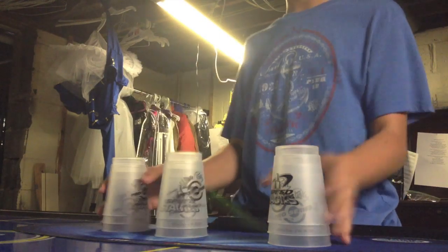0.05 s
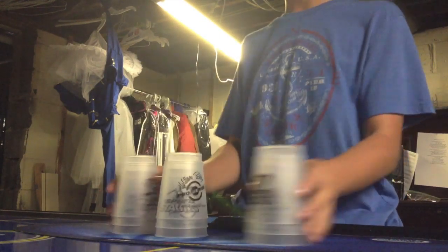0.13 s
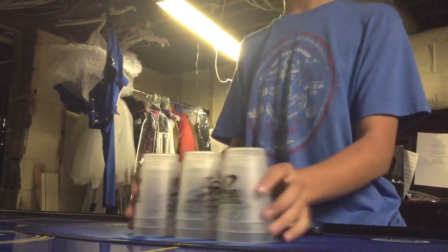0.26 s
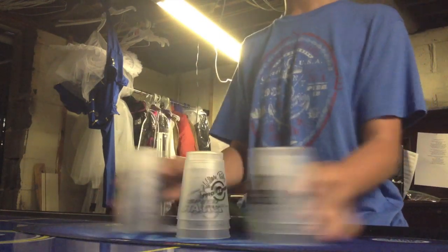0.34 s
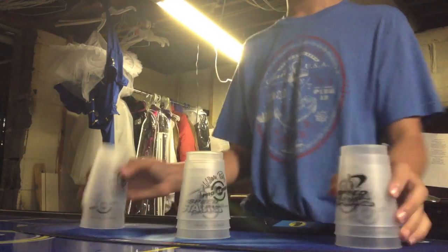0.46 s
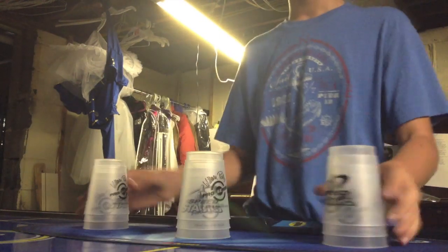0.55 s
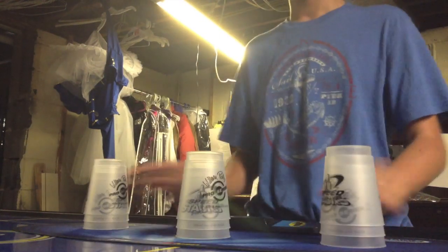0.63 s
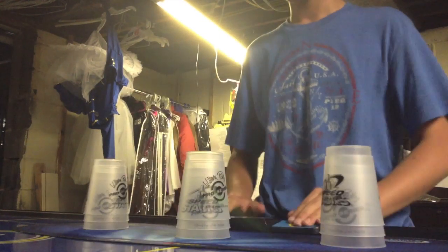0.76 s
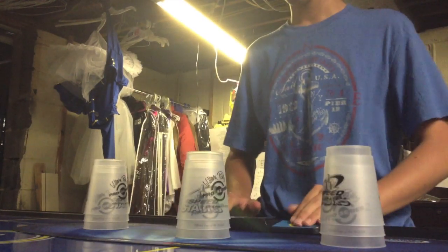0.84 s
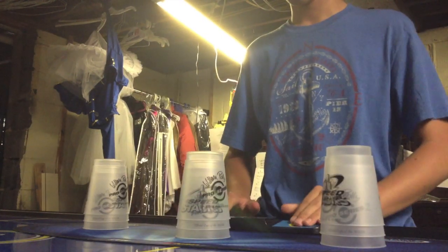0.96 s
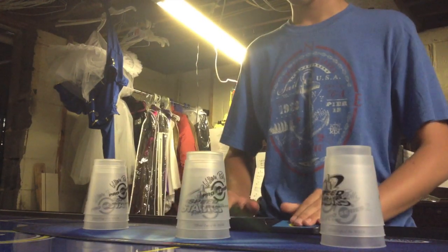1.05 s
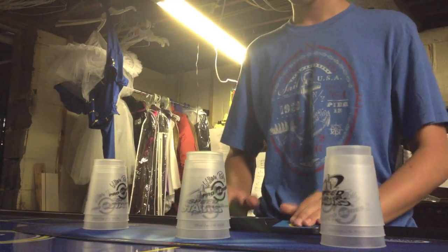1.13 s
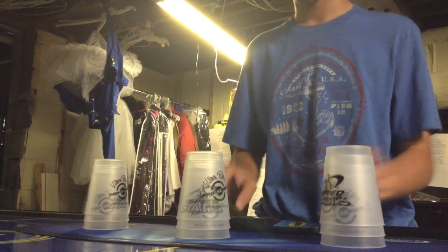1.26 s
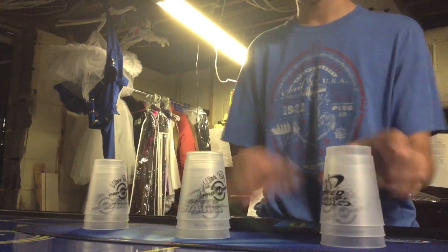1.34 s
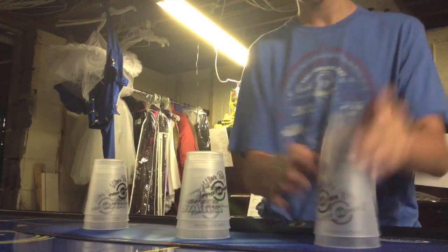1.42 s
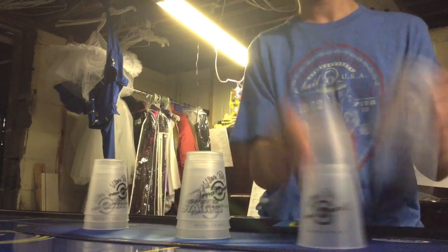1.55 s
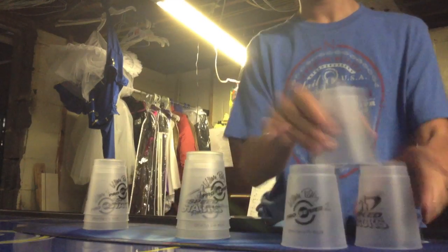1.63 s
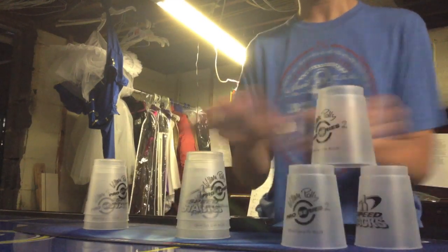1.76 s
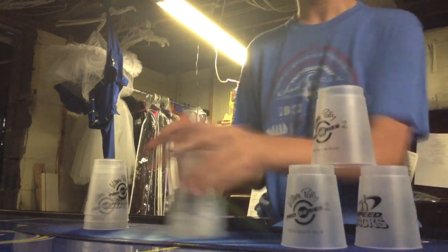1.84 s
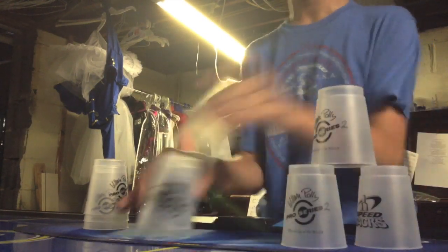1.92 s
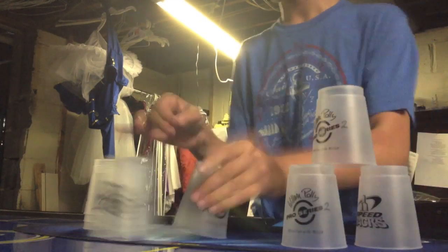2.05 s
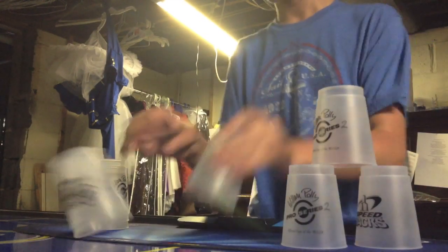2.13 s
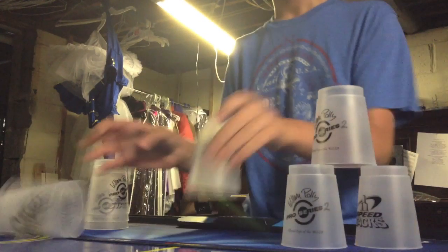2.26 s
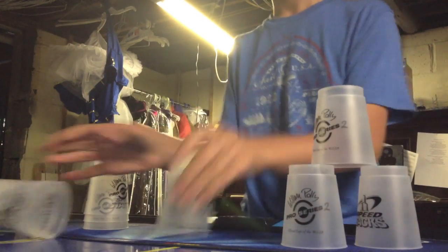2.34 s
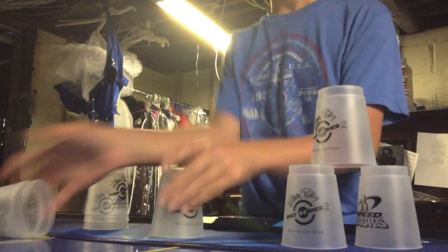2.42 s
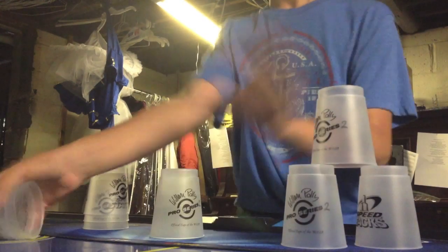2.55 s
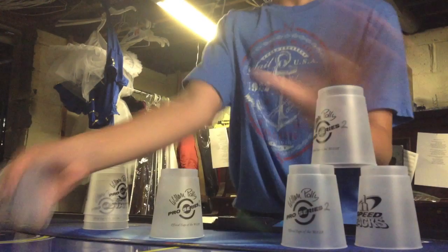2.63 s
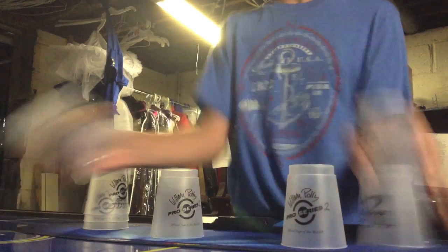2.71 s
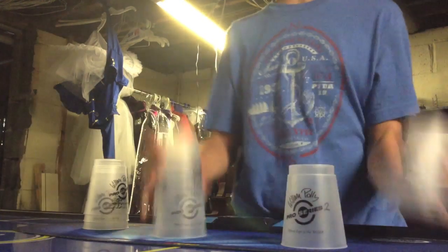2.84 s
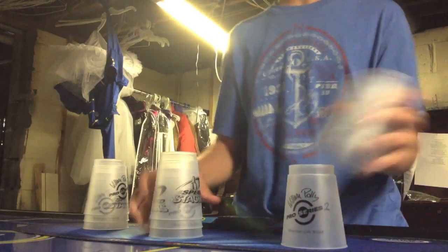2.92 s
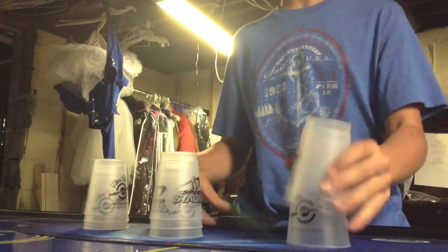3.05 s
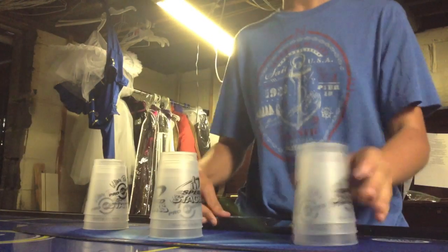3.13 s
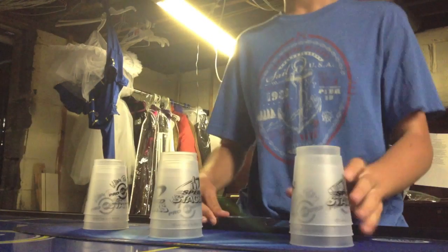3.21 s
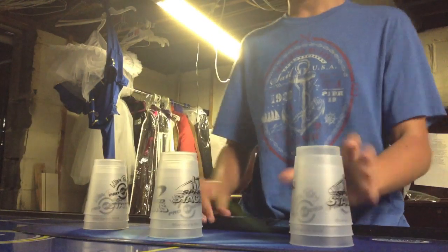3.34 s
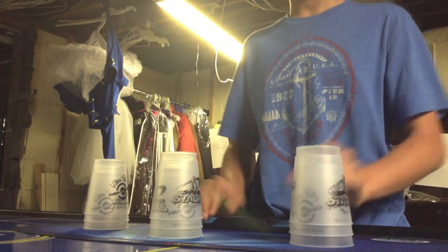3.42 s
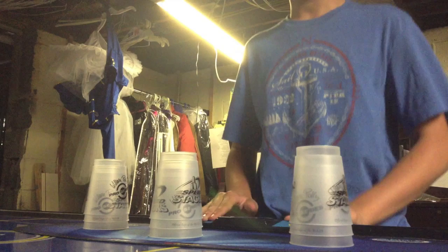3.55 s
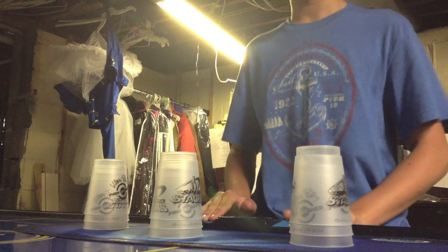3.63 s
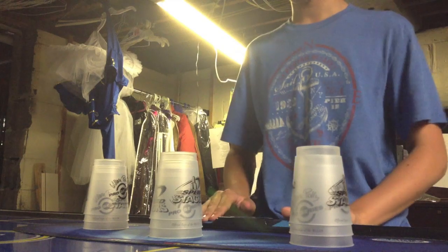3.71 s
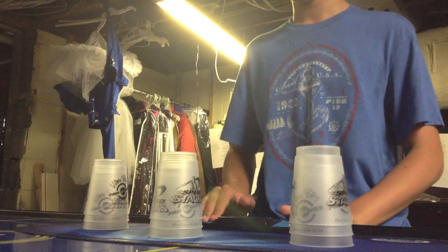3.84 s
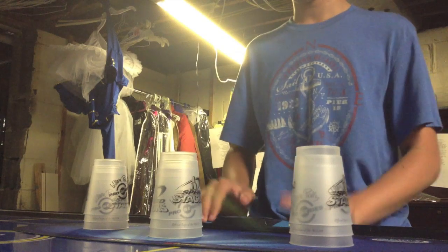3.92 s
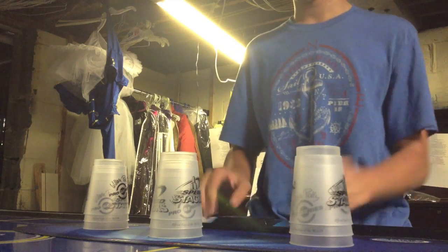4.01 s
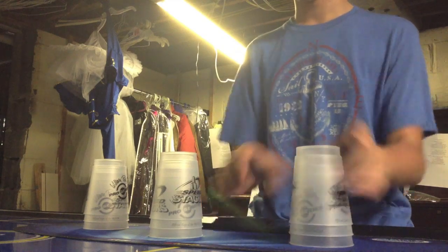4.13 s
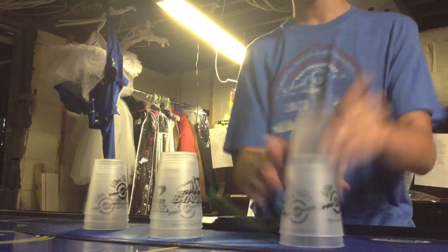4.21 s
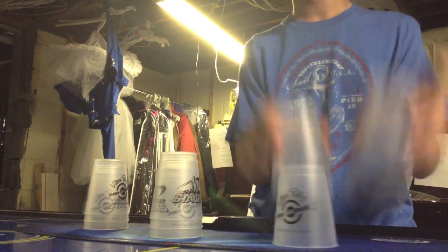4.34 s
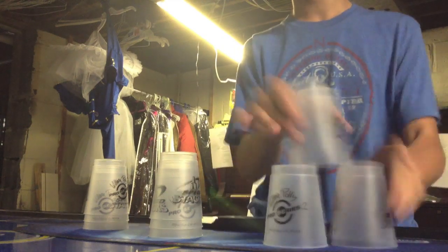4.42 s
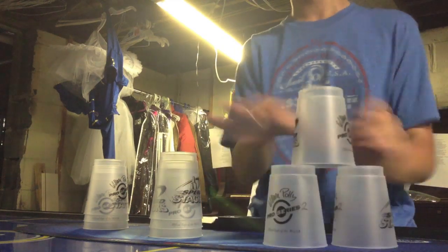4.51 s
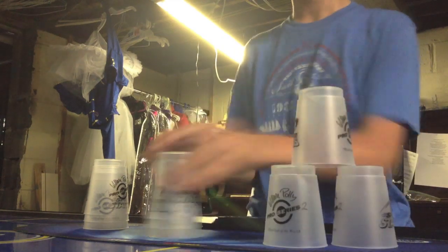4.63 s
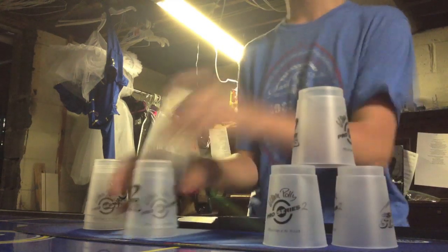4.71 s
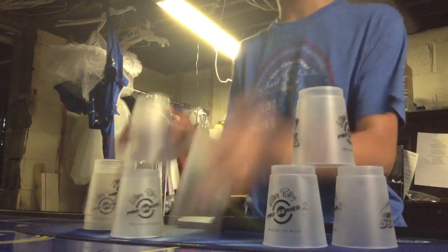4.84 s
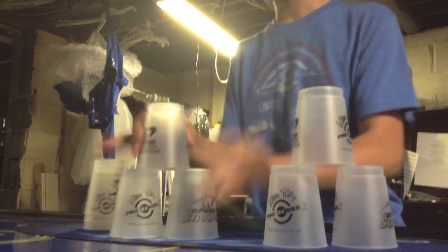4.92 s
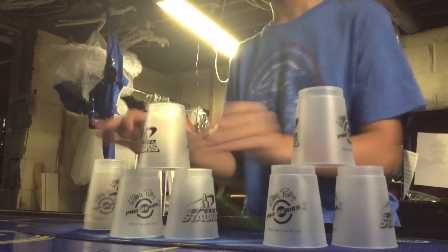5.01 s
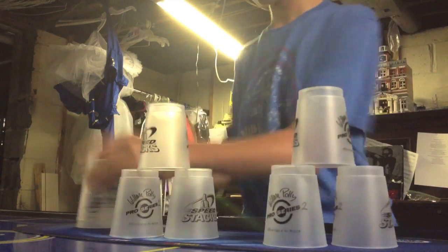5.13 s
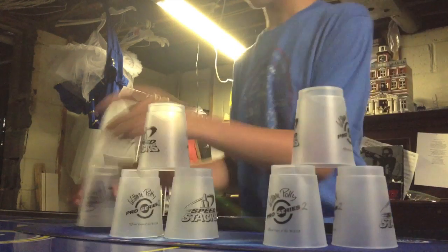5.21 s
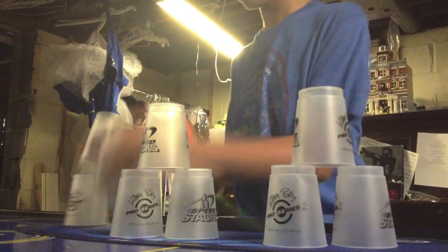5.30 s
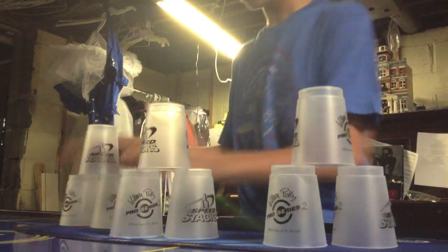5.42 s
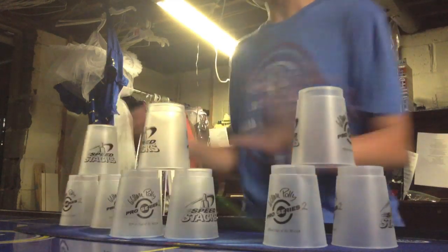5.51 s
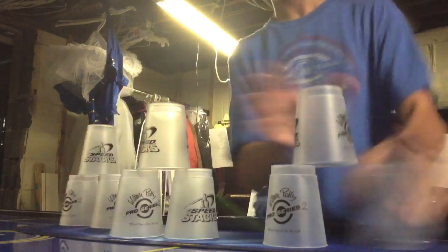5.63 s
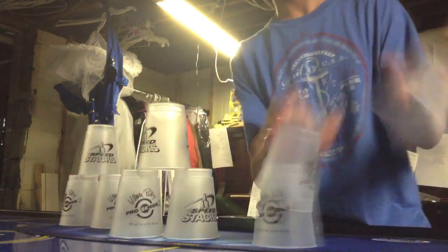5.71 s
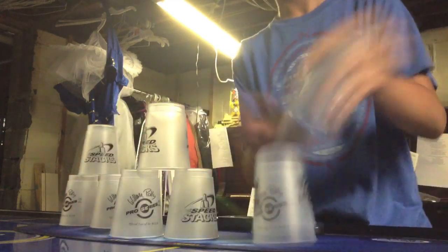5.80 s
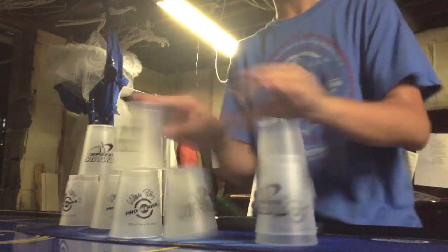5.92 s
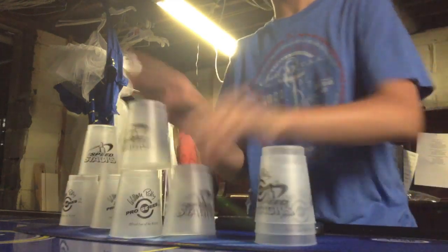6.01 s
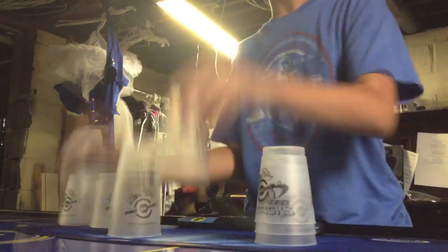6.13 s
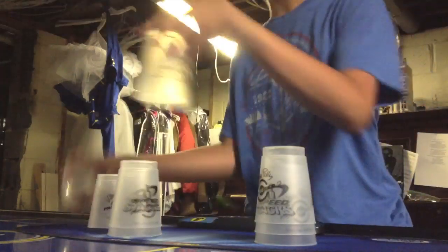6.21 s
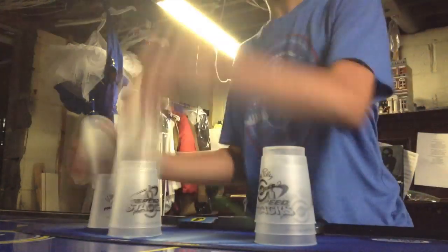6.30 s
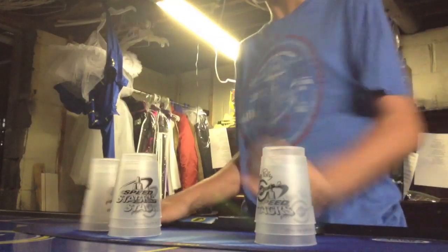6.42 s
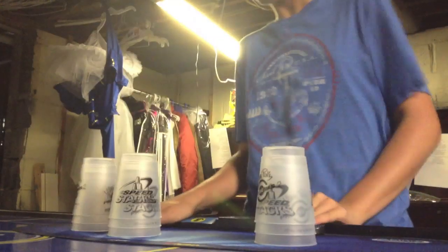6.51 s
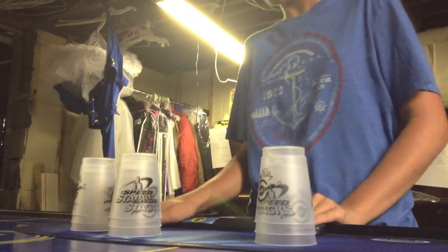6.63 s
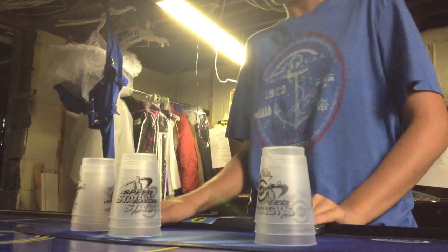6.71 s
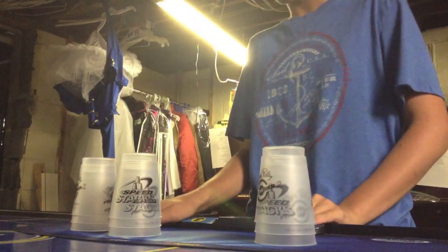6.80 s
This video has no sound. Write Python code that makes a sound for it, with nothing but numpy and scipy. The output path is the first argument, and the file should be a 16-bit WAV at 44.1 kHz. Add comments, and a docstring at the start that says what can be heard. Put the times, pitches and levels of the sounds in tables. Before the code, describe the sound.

Quick bursts of plastic cups being stacked and unstacked indoors, with sharp clacks, hollow taps on a mat and brief sliding hisses.

```python
"""Speed stacking with plastic cups

Thin cups are stacked into pyramids and swept down again, fast, on a padded table in a small room.
Nested cups hiss and jostle as they slide, walls clack on walls, and rims land on the mat and pop
the air inside. Palms thud down after a run, and one dragged cup squeaks faintly.
The room answers every blow over a steady background hush."""
import sys
import numpy as np
from scipy import signal
from scipy.fft import rfft, irfft, next_fast_len
from scipy.io import wavfile

SR = 44100
rng = np.random.default_rng(int(sys.argv[2]) if len(sys.argv) > 2 else 0)


def master_out(mix):
    """Clip the mix to full scale and print it as 16-bit PCM to the path in sys.argv[1]."""
    frames = np.transpose(np.atleast_2d(mix))
    ceiling = np.clip(frames, -1, 1)
    pcm = np.round(ceiling * 32767).astype(np.int16)
    wavfile.write(sys.argv[1], SR, pcm)


N = 302422


def amp(db):
    """Turn decibels into a number to multiply a sound by."""
    return 10 ** (np.asarray(db) / 20)


def unit(x):
    """Scale a sound so that its average level (rms) is 1."""
    return x / np.sqrt(np.mean(x ** 2) + 1e-20)


def blow(x):
    """Give a short sound as much energy as 10 ms of sound at level 1."""
    return x / np.sqrt(np.sum(x ** 2) / (SR * .01) + 1e-20)


def seconds(size):
    """The time of each sample."""
    return np.arange(size) / SR


def along(points, hz):
    """Read between the rows of a (frequency, value) table, spacing octaves evenly."""
    freqs, values = np.transpose(points)
    return np.interp(np.log(hz + 1), np.log(freqs + 1), values)


def filtered(x, response):
    """Turn each frequency of x up or down by the gain that response gives it."""
    size = next_fast_len(len(x) + 4096)
    return irfft(rfft(x, size) * response(np.fft.rfftfreq(size, 1 / SR)), size)[:len(x)]


def pulse(response, size):
    """The sharpest click that has the given gain at each frequency."""
    gains = np.maximum(response(np.fft.rfftfreq(size, 1 / SR)), 1e-6)
    cepstrum = irfft(np.log(gains))
    # folding the second half onto the first packs the energy at the start
    cepstrum[1:size // 2] *= 2
    cepstrum[size // 2 + 1:] = 0
    return irfft(np.exp(rfft(cepstrum)))


def ring(t, hz, fade, attack):
    """A tone that builds up over attack seconds and dies away by 60 dB in fade seconds."""
    return np.sin(2 * np.pi * hz * t) * amp(-60 * t / fade) * (1 - np.exp(-t / attack))


def add(track, s, sound):
    """Mix a sound into the track, starting s seconds in."""
    start = max(round(s * SR), 0)
    part = track[start:start + len(sound)]
    part += sound[:len(part)]


# the tone of the hush, from bass to treble (frequency [Hz], level [dB])
HUSH_TONE = [(30, 0), (85, -13.5), (135, -1.5), (370, -2.5), (435, -15), (512, 5.5), (600, -6.5), (950, -4),
             (2300, -13.5), (5000, -21.5), (5500, -33.5), (7800, -28.5), (9500, -35), (15500, -41)]
# how the hush wavers (time [s], level change [dB])
HUSH_SWELL = [(0, 5.5), (.7, 5), (1.4, 4.5), (1.87, -1), (2.25, 0), (2.7, -1), (3.45, 2), (4.2, 3.5),
              (4.68, 0), (5.15, 0.5), (5.601, 1.5), (6.4, 2.5), (6.86, -1)]
def hush(level_db=-53.5):
    """The soft background noise of the room."""
    swell_db = np.interp(seconds(N), *np.transpose(HUSH_SWELL))
    noise = unit(filtered(rng.standard_normal(N), lambda hz: amp(along(HUSH_TONE, hz))))
    return amp(level_db + swell_db) * noise


# the high notes of a cup's stiff rim and base (pitch [Hz], width [Hz], strength [dB])
RIM_NOTES = [(1890, 68, -3), (3254, 550, 4), (4100, 120, -2), (5670, 190, -2), (6060, 150, -18),
             (7000, 180, 0)]
def plastic(hz):
    """The rim and base boost their own notes in every rub and snap: the gain at each frequency."""
    peaks = sum(amp(db) ** 2 / (1 + ((hz - pitch) / (width / 2)) ** 2) for pitch, width, db in RIM_NOTES)
    return np.sqrt(1 + peaks)


# the tone of rubbing plastic (frequency [Hz], level [dB])
RUB_TONE = [(100, -18), (170, 15), (300, -7.5), (600, 6), (1200, -12.5), (2500, -2), (6000, 1), (9000, 0),
            (12000, -5), (15500, -10)]
# cups sliding in or out of each other, and one brief faint rub at 3.54 s (start [s], length [s], peak level
# [dB])
SLIDES = [(0, .16, -44.5), (0.189, 0.2, -45), (0.365, 0.22, -50), (1.453, 0.21, -50), (1.918, .11, -47.5),
          (2.722, .15, -51.5), (2.888, 0.068, -42), (3.067, 0.23, -49.5), (3.54, 0.032, -58),
          (4.221, 0.2, -51), (4.374, 0.15, -65), (4.697, 0.11, -57), (5.194, .19, -50),
          (5.661, 0.072, -44.5), (5.798, 0.1, -40), (5.909, 0.031, -34), (5.984, .15, -42),
          (6.212, 0.032, -25), (6.37, 0.17, -35.5)]
def slides(slips_per_s=130, slip_db=-5.5):
    """Wall rubs along wall: a hiss with scratchy ticks where it catches and slips."""
    t, pressure = seconds(N), np.zeros(N)
    for start, length, db in SLIDES:
        # a stroke presses hardest about a quarter of the way through
        swell_db = np.interp((t - start) / length, [0, .24, 1], [-10, 0, -7])
        outside_s = np.maximum(start - t, 0) + np.maximum(t - start - length, 0)
        pressure += amp(db + swell_db) * np.exp(-np.minimum(outside_s / .007, 20))
    grip = unit(filtered(rng.standard_normal(N), lambda hz: np.exp(-(hz / 110) ** 2)))
    hiss = unit(rng.standard_normal(N) * amp(2.4 * grip))
    slips = unit((rng.random(N) < slips_per_s / SR) * rng.standard_normal(N))
    scrape = hiss + amp(slip_db) * slips
    rub = unit(filtered(scrape, lambda hz: amp(along(RUB_TONE, hz)) * plastic(hz)))
    return pressure * rub


# the tone of the room's echo (frequency [Hz], level [dB])
ECHO_TONE = [(60, -44), (160, 6), (300, -11), (600, 0), (1000, -7.5), (2000, -5.5), (5000, -9.5),
             (9000, -11.5), (15000, -3)]
# how long the echo lasts (frequency [Hz], time to fade by 60 dB [s])
ECHO_FADE = [(150, 0.24), (500, 0.2), (1200, 0.24), (3000, 0.2), (7000, 0.24), (15000, 0.19)]
def room_echo(sound, echo_db, build_s):
    """The room's blurred answer, echo_db against the sound; each place on the table has its own."""
    hz, t, noise = signal.stft(rng.standard_normal(SR * 2 // 5), SR, nperseg=256)
    fade = amp(along(ECHO_TONE, hz)[:, None] - 60 * t / along(ECHO_FADE, hz)[:, None])
    room = signal.istft(noise * fade, SR, nperseg=256)[1]
    build_up = 1 - np.exp(-(seconds(len(room)) / build_s) ** 2)
    tail = signal.fftconvolve(sound, room * build_up)
    return amp(echo_db) * tail * np.linalg.norm(sound) / np.linalg.norm(tail)


def jostles(spread_db, per_s=10, firm_db=-43.5):
    """Sliding cups touch by chance: rows of (time [s], level change [dB], pitch factor)."""
    rows = []
    for start, length, db in SLIDES:
        gentle_db = min(db - firm_db, 0)  # a gentle stroke jostles more faintly
        for when, force, pitch in rng.random((int(length * per_s), 3)):
            change_db = gentle_db + spread_db * (2 * force - 1)
            rows.append((start + when * length, change_db, 1.4 ** (pitch - .5)))
    return rows


# the tone of a snap (frequency [Hz], level [dB])
SNAP_TONE = [(300, -7), (1200, 6), (2500, 1), (3800, 1), (5600, 5), (9000, 0.5), (12000, -4.5),
             (15500, -15.5)]
def contact_snap(bright_hz, size):
    """Plastic hits plastic: a brighter snap has more treble, and each spot favours its own few notes."""
    tilt = 1.36 * np.log(bright_hz / 6700)
    spot = np.transpose([np.geomspace(1500, 15500, num=34), 2.4 * rng.standard_normal(34)])

    def tone(hz):
        treble = (np.clip(hz, 3500, 14000) / 7000) ** tilt
        return amp(along(SNAP_TONE, hz) + along(spot, hz)) * plastic(hz) * treble
    return blow(pulse(tone, size))


# the notes of a cup wall (pitch [times the wall pitch], level [dB], time to fade by 60 dB [s])
WALL_NOTES = [(0.718, 4, 0.0068), (1.002, 6, 0.012), (1.24, -9.5, 0.021), (1.62, 6, 0.0046)]
def wall_ring(t, wall_hz):
    """A struck wall bends in several ways at once, in a slightly different mix each time."""
    return blow(sum(amp(db + rng.normal(0, 1)) * ring(t, wall_hz * ratio, fade, attack=.0019)
                    for ratio, db, fade in WALL_NOTES))


# how bright the snaps are, most while a toppled cup is gathered up (time [s], brightness [Hz])
SNAP_BRIGHTNESS = [(0, 5700), (.6, 6600), (1.7, 5900), (2.05, 8100), (2.35, 8500), (2.55, 6700),
                   (2.9, 6900), (3.3, 5900), (5.4, 5700), (5.8, 6400), (6.5, 5600)]
# cups hitting each other (time [s], click level [dB], wall ring level [dB], wall pitch [Hz])
CLACKS = [ (.0572, -53, -40.5, 1720), (.1275, -45.5, -36.5, 1760), (.2118, -46, -36, 1760),
          (.3284, -55, -39, 1630), (.526, -33.5, -39, 2900), (.5895, -22, -29.5, 1950),
          (.7895, -35.5, -43, 1500), (1.4922, -36.5, -53, 2800), (1.5187, -43, -31.5, 1340),
          (1.6456, -37, -44, 1360), (1.6706, -25.5, -33, 1630), (1.9032, -44, -61, 2695),
          (1.9958, -32, -48, 2950), (2.0914, -26.5, -41, 2300), (2.3464, -26, -30.5, 1430),
          (2.4683, -26.5, -33, 1810), (2.5084, -41, -54, 1900), (2.5535, -42.5, -61, 1920),
          (2.5983, -48, -59, 1740), (2.614, -38, -57, 2200), (2.6199, -30.5, -36.5, 1500),
          (2.7846, -29, -33.5, 1290), (2.7994, -32.5, -59, 2830), (2.824, -35, -35, 1630),
          (2.837, -33.5, -39, 3100), (2.872, -34.5, -42, 1700), (2.898, -33, -40, 1360),
          (2.9331, -47, -31, 1850), (2.939, -26.5, -23.5, 1770), (2.9556, -37, -44, 1590),
          (3.025, -26, -31.5, 1165), (3.0574, -35, -59, 1390), (3.1464, -51, -45, 1640),
          (3.1942, -29, -26, 1675), (3.2197, -32, -34.5, 1420), (3.3858, -59.5, -49.5, 1410),
          (4.267, -44.5, -53, 2700), (4.2933, -41.5, -40.5, 1320), (4.458, -29, -57, 1240),
          (4.7044, -45.5, -43, 1580), (4.7644, -40.5, -65, 1840), (4.8111, -36.5, -38, 1760),
          (4.9117, -42, -73, 1750), (4.9509, -34, -31.5, 1460), (5.1701, -46.5, -45.5, 1250),
          (5.352, -43.5, -61, 3630), (5.4107, -52, -48, 1390), (5.427, -20, -21, 1230),
          (5.6884, -49, -40, 1090), (5.749, -34, -45, 1270), (5.776, -28, -45, 3750),
          (5.795, -28.5, -32, 1510), (5.8669, -48, -39.5, 1970), (5.8865, -24, -26, 2100),
          (5.8898, -22, -30.5, 1500), (5.8995, -25, -48, 1730), (5.979, -23.5, -45, 1250),
          (6.0341, -51, -31, 1720), (6.0454, -38, -31, 1500), (6.0915, -37, -29.5, 1225),
          (6.14, -38, -53, 1700), (6.172, -41, -57, 1970), (6.1936, -36, -44, 1450),
          (6.2148, -27, -22, 1870), (6.2317, -26.5, -37, 2830), (6.2405, -20, -29, 2070),
          (6.253, -22, -41, 1980), (6.3702, -34.5, -42.5, 1950), (6.3765, -25, -32, 1360),
          (6.4003, -27.5, -42, 2160), (6.4185, -18.5, -22.5, 3170), (6.475, -35, -32.5, 1580),
          (6.5244, -40, -32, 1250)]
def clacks():
    """Cup hits cup: a snap and a few milliseconds of chatter, then the thin wall rings briefly."""
    track, t = np.zeros(N), seconds(2048)
    top_cups, _ = pyramids()
    taps = [(s, -51.5 + db, -46.5 + db, 1650 * pitch) for s, db, pitch in jostles(spread_db=5)]
    for s, click_db, wall_db, wall_hz in CLACKS + top_cups + taps:
        bright_hz = np.interp(s, *np.transpose(SNAP_BRIGHTNESS))
        snap = contact_snap(bright_hz, len(t))
        # a spray of tiny touches, shorter for a brighter snap
        chatter_s = .0025 * (6500 / bright_hz) ** 2
        touches = rng.standard_normal(len(t)) * np.exp(-t / chatter_s)
        chatter = blow(signal.fftconvolve(snap, touches)[:len(t)])
        main_snap = amp(-2) * np.roll(snap, round(.0005 * SR))  # just after the first touch
        click = amp(click_db) * blow(chatter + main_snap)
        wall = amp(wall_db) * wall_ring(t, wall_hz)
        # the wall's first wide swing carries most of its sound into the room
        swing = amp(wall_db + 2) * blow(wall * np.exp(-t / .00063))
        add(track, s, click + wall)
        add(track, s, room_echo(amp(click_db) * snap + swing, echo_db=-5.5, build_s=.0025))
    return track


# cups landing on the mat or a stack, and one light bump at 1.92 s (time [s], pop level [dB], pop pitch [Hz],
# thump level [dB])
LANDINGS = [ (.3309, -38, 564, -40), (.5878, -17, 610, -21.5), (.7924, -38, 600, -25),
            (1.6448, -40, 675, -35), (1.9072, -46, 566, -39.5), (1.9222, -55, 720, -39.5),
            (1.9949, -38, 980, -43), (2.0905, -41, 1060, -47), (2.1155, -27, 750, -21),
            (2.1325, -32, 645, -25.5), (2.3478, -33.5, 1200, -29.5), (2.4462, -55, 880, -39),
            (2.4697, -33, 940, -28), (2.6206, -32, 730, -33), (2.7363, -37.5, 1040, -33),
            (2.783, -43, 1310, -42), (2.8361, -33, 736, -34.5), (2.9037, -27, 557, -32),
            (2.9401, -26, 920, -27), (3.025, -16.5, 552, -25), (3.1949, -23, 800, -26.5),
            (3.2169, -31, 828, -26), (4.243, -50, 750, -44), (4.287, -44, 1230, -39),
            (4.7045, -40.5, 533, -36), (4.8098, -38.5, 1050, -42.5), (4.8815, -41.5, 537, -42),
            (5.1704, -43, 594, -38), (5.336, -46, 656, -38.5), (5.4091, -34.5, 880, -28),
            (5.4268, -15, 826, -18.5), (5.6743, -37, 570, -32), (5.7394, -34, 630, -29),
            (5.7476, -26, 993, -27), (5.7959, -21, 744, -19), (5.8876, -23, 1090, -23.5),
            (5.9711, -29.5, 525, -27), (5.9788, -17.5, 1040, -19), (6.0458, -43, 764, -30),
            (6.0705, -31.5, 543, -43), (6.1197, -32.5, 586, -27.5), (6.1936, -31.5, 775, -26),
            (6.2145, -30, 805, -36), (6.2422, -20, 680, -25.5), (6.402, -40, 660, -27.5),
            (6.4196, -16.5, 724, -21), (6.4285, -26.5, 870, -19.5), (6.5235, -30, 656, -32.5)]
def landings():
    """A landing rim pops the air in the cup and thumps the padded table; the room favours the thump."""
    direct, echoes, t = np.zeros(N), np.zeros(N), seconds(4096)
    _, dealt_cups = pyramids()
    nudges = [(s, -45.5 + db, 670 * pitch, -39.5 + db) for s, db, pitch in jostles(spread_db=3)]
    for s, pop_db, pop_hz, thump_db in LANDINGS + dealt_cups + nudges:
        # the mat stiffens under a harder landing, so the pitch climbs an octave per 55 dB
        thump_hz = 392.6 * 2 ** ((thump_db + 29) / 55)
        pop = amp(pop_db) * blow(ring(t, pop_hz, fade=.01, attack=.0051))
        thump = amp(thump_db) * blow(ring(t, thump_hz, fade=.0085, attack=.014))
        add(direct, s, pop + thump)
        add(echoes, s, room_echo(pop, echo_db=-6, build_s=.0019))
        add(echoes, s, room_echo(thump, echo_db=-1.5, build_s=.0011))
    return direct + echoes + room_boom(direct)


# low notes of the room and the standing cups (pitch [Hz], level [dB], time to fade by 60 dB [s])
BOOM_NOTES = [(163.9, -1.5, 0.35), (194.6, -15.5, 0.98), (251.2, 0.5, 0.32), (296, 6.5, 0.11),
              (435, -10.5, 0.41), (511, -1.5, 0.26), (621, -6, 0.187), (1025, -9, 0.21), (1215, -16, .22)]
def room_boom(blows):
    """Blows on the table set the room and the standing cups booming."""
    t = seconds(20000)
    notes = sum(amp(db) * ring(t, hz, fade, attack=.0019) for hz, db, fade in BOOM_NOTES)
    return amp(-52.5) * signal.fftconvolve(blows, notes)[:N]


# palms coming down on the mat after a run (time [s], level [dB])
PALMS = [(.797, -42), (6.431, -23.5)]
def palms():
    """A flat hand gives the padded table one dull, low thud."""
    direct, echoes, t = np.zeros(N), np.zeros(N), seconds(4096)
    for s, db in PALMS:
        thud = amp(db) * blow(ring(t, hz=167, fade=.036, attack=.0037))
        add(direct, s, thud)
        add(echoes, s, room_echo(thud, echo_db=-4, build_s=.003))
    return direct + echoes + room_boom(direct)


# three cups dealt in one move (first cup lands [s], top cup lands [s], level [dB], pop pitch [Hz])
PYRAMIDS = [(1.678, 1.6994, -17.5, 736), (4.464, 4.491, -17, 750), (4.9402, 4.9697, -16, 800)]
def pyramids(top_wall_hz=1225):
    """Two base cups land in a blink and a third clacks on top: rows for clacks() and landings()."""
    clack_rows, landing_rows = [], []
    for first_s, top_s, db, pop_hz in PYRAMIDS:
        landing_rows.append((first_s, db, pop_hz, db + 3.5))  # the first cup hits the mat hardest
        landing_rows.append((first_s + .012, db, pop_hz * 1.234, db - 7))
        # the top cup lands, rocks once and settles more softly
        for s, level in [(top_s, db), (top_s + .008, db - 5.5)]:
            clack_rows.append((s, level - 4, level - 4.5, top_wall_hz))
            landing_rows.append((s + .0005, level, pop_hz, level - 7))
    return clack_rows, landing_rows


# a cup dragged by its rim sings faintly (time [s], level [dB])
SQUEAK = [(5.55, -76), (5.6, -64), (5.66, -61), (5.7, -70)]
def squeak(pitch_hz=6000, half_width_hz=350):
    """Steady sticking and slipping makes the rim sing in one narrow, high band."""
    level = amp(np.interp(seconds(N), *np.transpose(SQUEAK), left=-120, right=-120))
    band = filtered(rng.standard_normal(N), lambda hz: 1 / (1 + ((hz - pitch_hz) / half_width_hz) ** 2))
    return level * unit(band)


def scene():
    """The cups and hands over the room's hush, in one channel."""
    rubbing = slides() + squeak()
    rubbing += room_echo(rubbing, echo_db=-13, build_s=.0054)[:N]
    return (rubbing + clacks() + landings() + palms() + hush())[None]


def record(dry):
    """A small microphone loses deep bass; the recorder rounds off peaks and cuts the highest treble."""
    bass_hz, top_hz, ceiling = 135, 15500, .72
    bass_cut = signal.butter(4, bass_hz, "highpass", fs=SR, output="sos")
    thin = signal.sosfilt(bass_cut, dry[0]) + amp(-19.5) * dry[0]  # a little bass still gets through
    rounded = thin / (1 + np.abs(thin / ceiling) ** 6) ** (1 / 6)
    return filtered(rounded, lambda hz: 1 / (1 + (hz / top_hz) ** 120))[None]


dry = scene()
out = record(dry)
master_out(out)
```